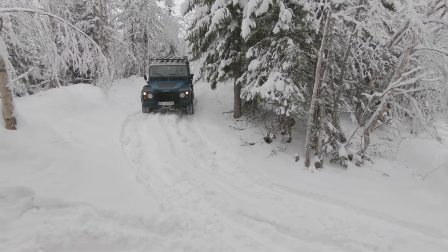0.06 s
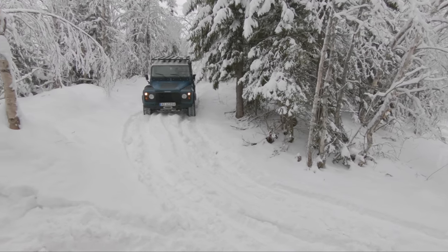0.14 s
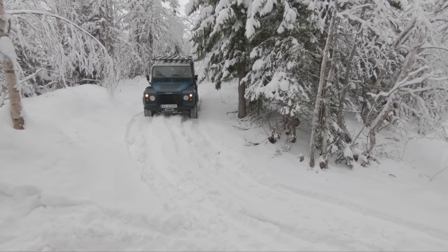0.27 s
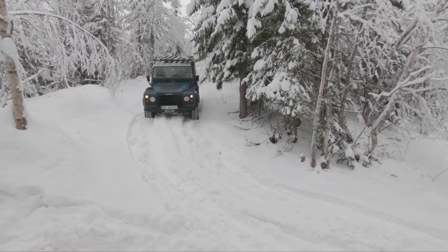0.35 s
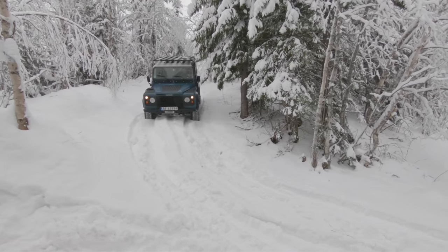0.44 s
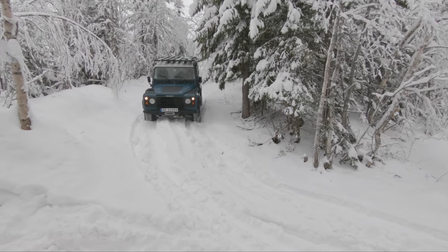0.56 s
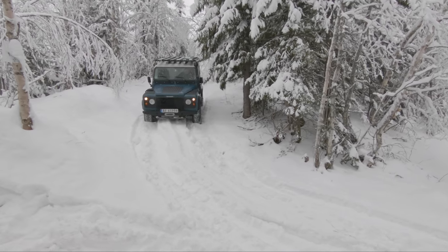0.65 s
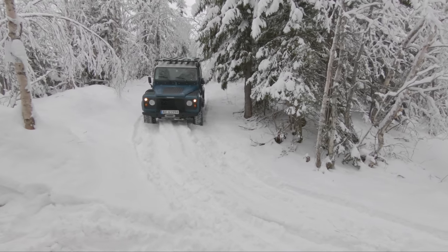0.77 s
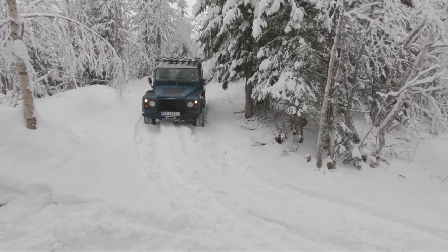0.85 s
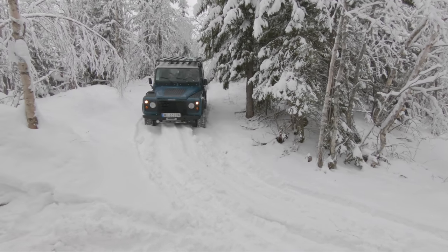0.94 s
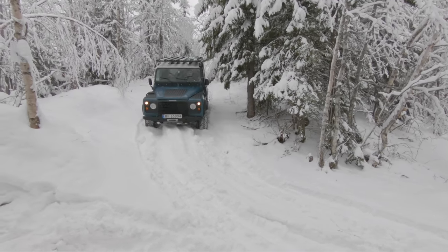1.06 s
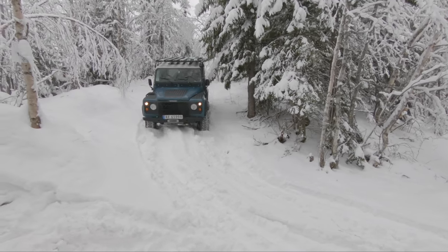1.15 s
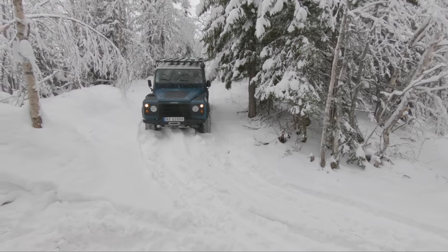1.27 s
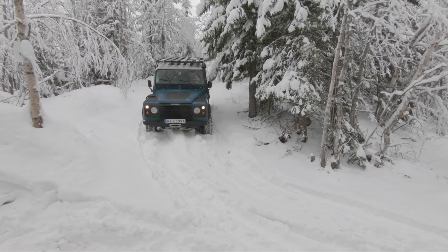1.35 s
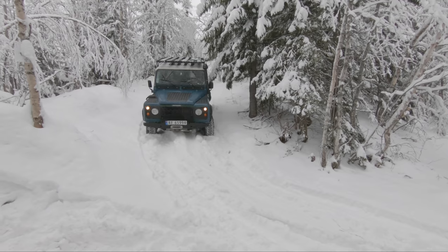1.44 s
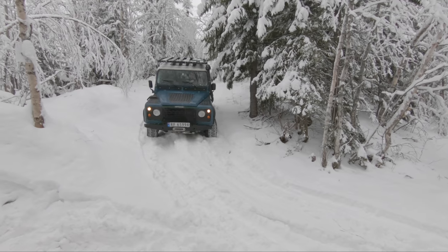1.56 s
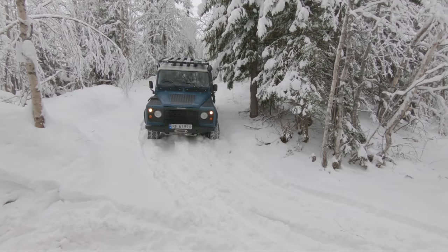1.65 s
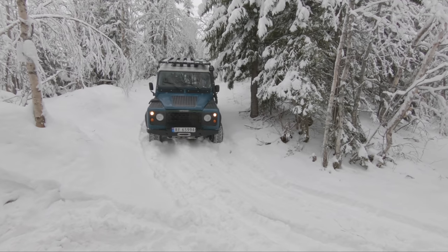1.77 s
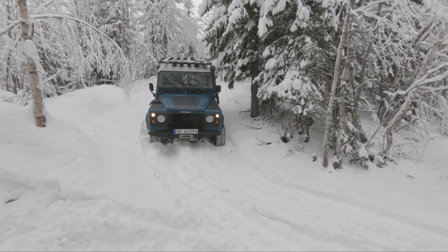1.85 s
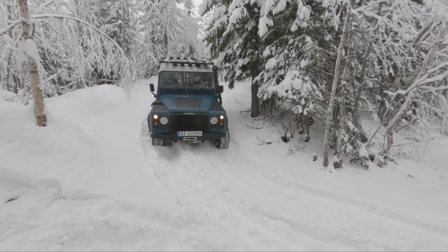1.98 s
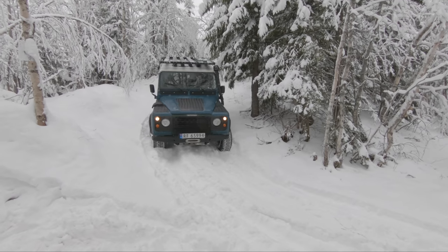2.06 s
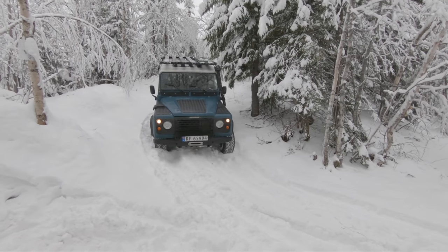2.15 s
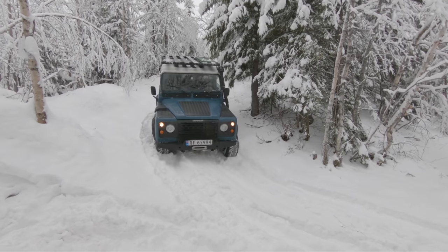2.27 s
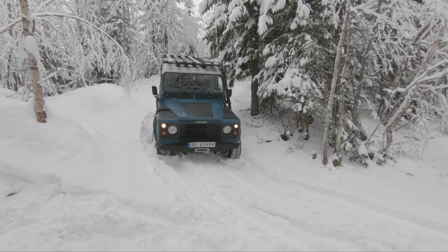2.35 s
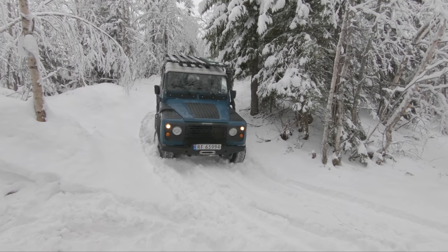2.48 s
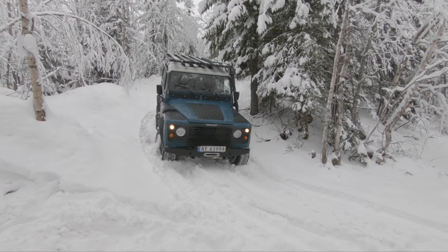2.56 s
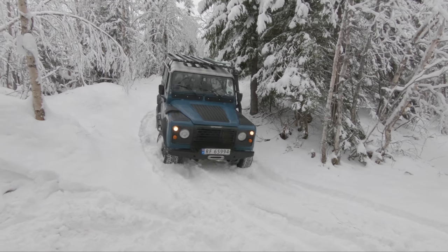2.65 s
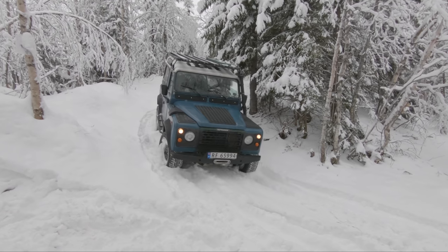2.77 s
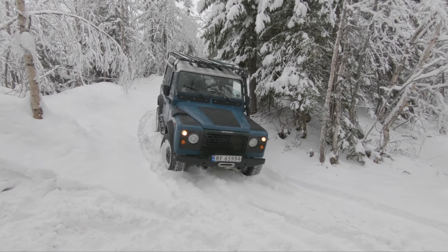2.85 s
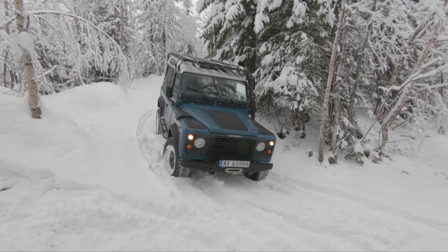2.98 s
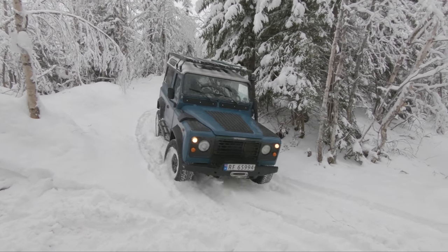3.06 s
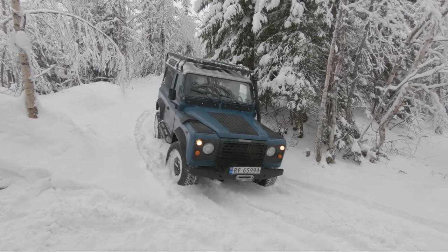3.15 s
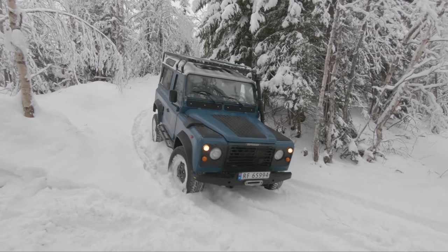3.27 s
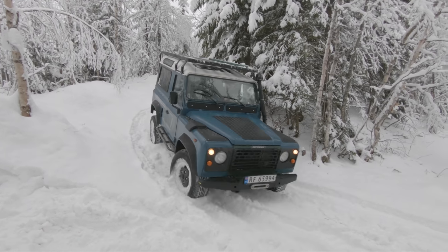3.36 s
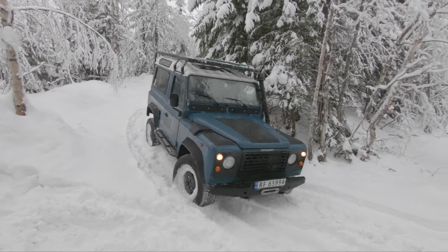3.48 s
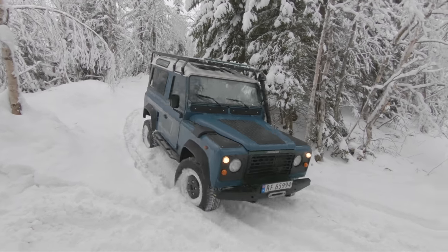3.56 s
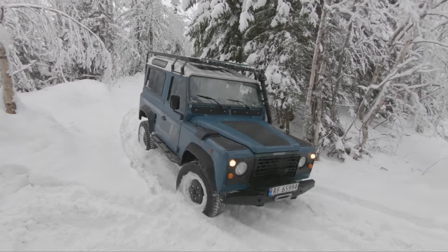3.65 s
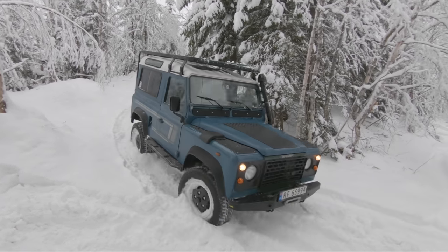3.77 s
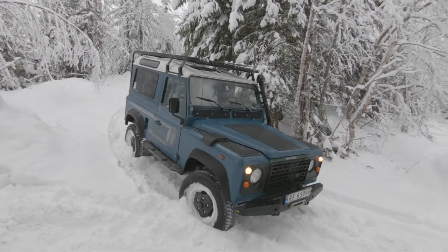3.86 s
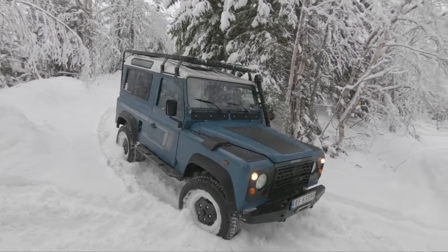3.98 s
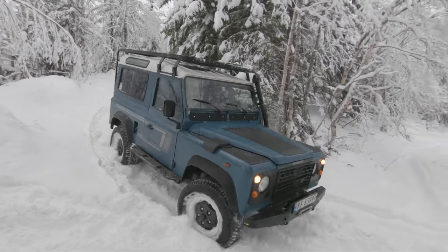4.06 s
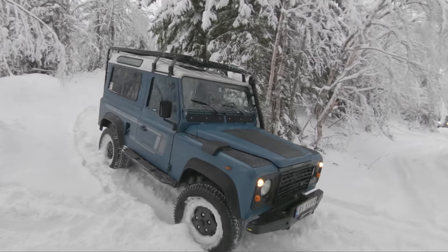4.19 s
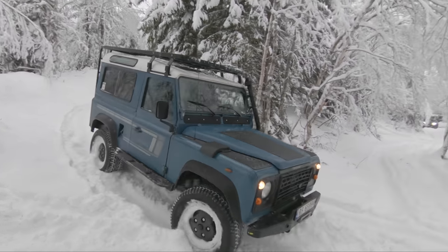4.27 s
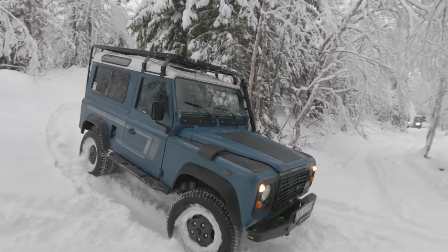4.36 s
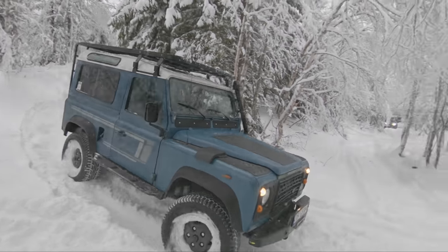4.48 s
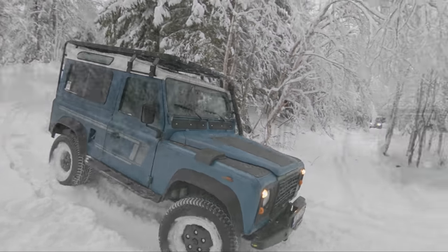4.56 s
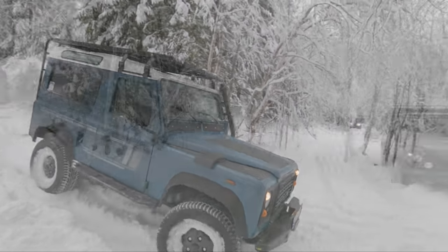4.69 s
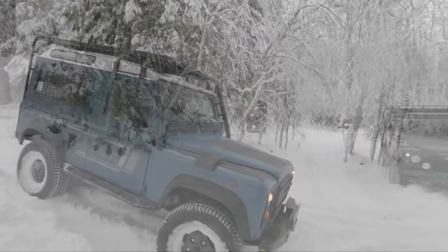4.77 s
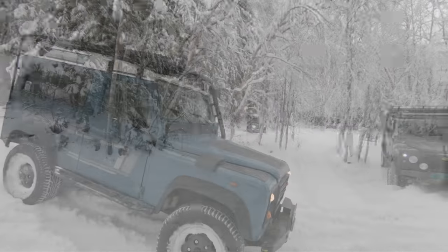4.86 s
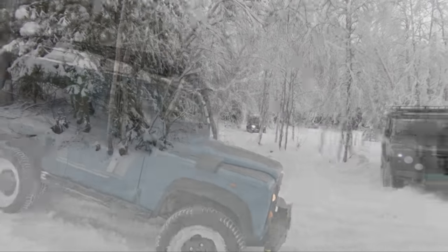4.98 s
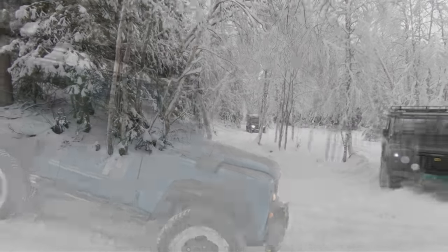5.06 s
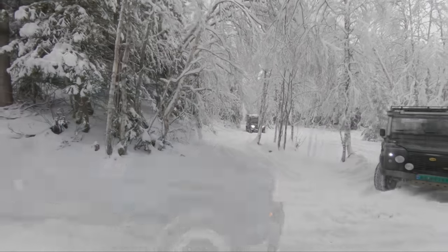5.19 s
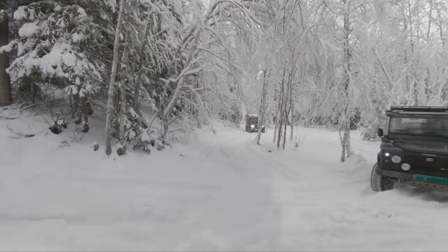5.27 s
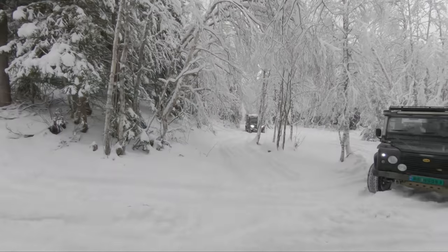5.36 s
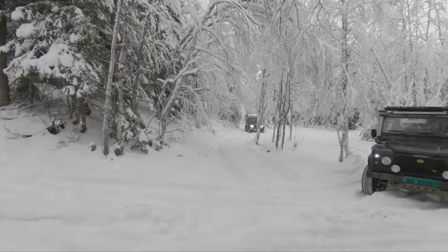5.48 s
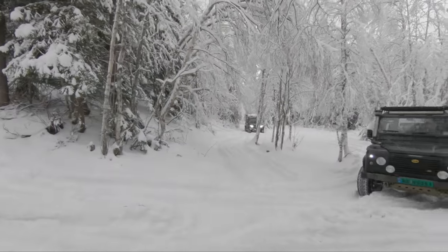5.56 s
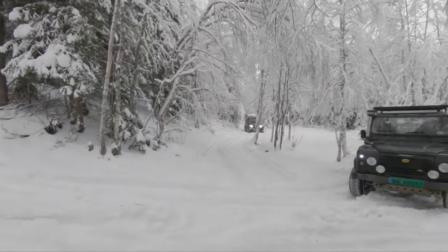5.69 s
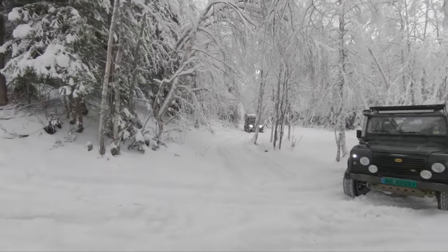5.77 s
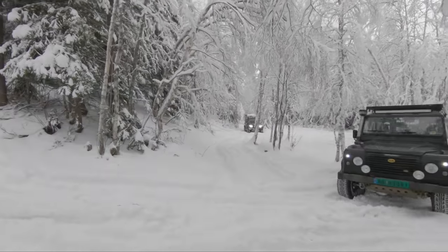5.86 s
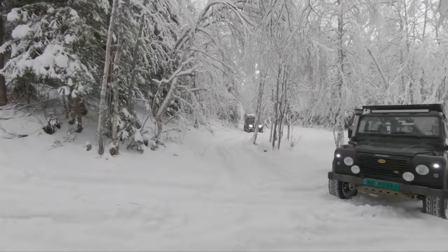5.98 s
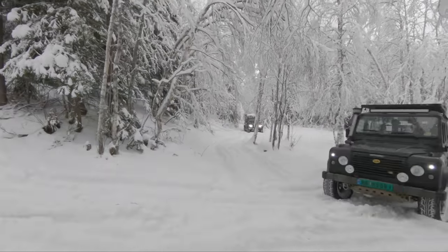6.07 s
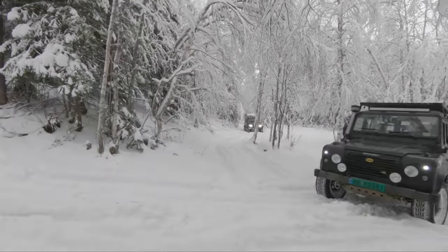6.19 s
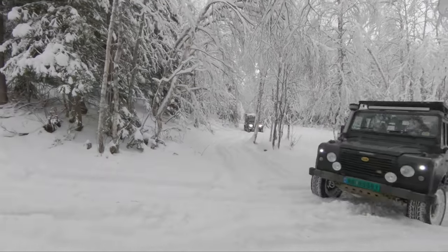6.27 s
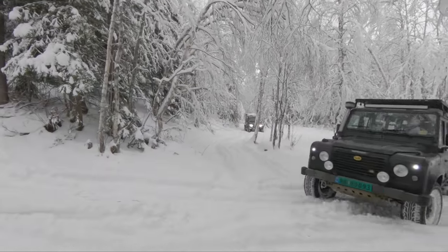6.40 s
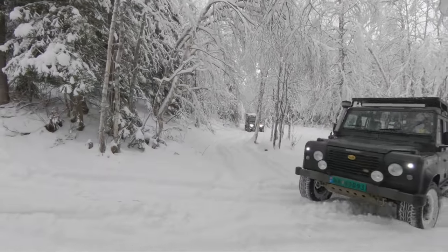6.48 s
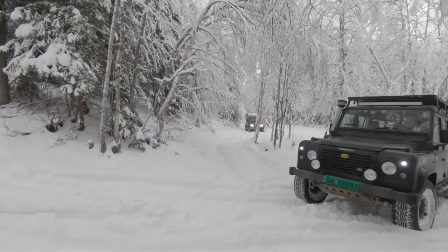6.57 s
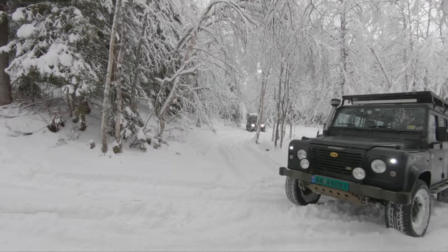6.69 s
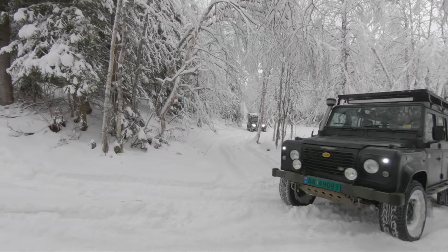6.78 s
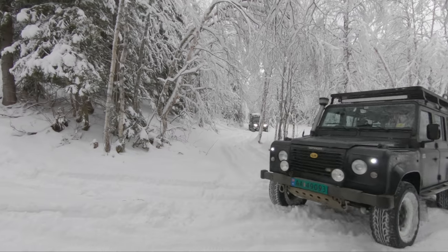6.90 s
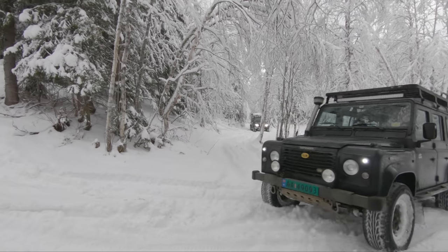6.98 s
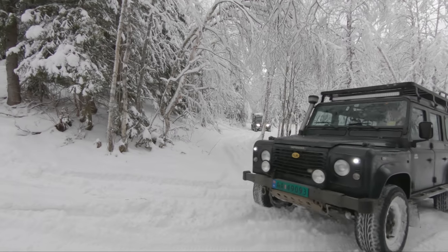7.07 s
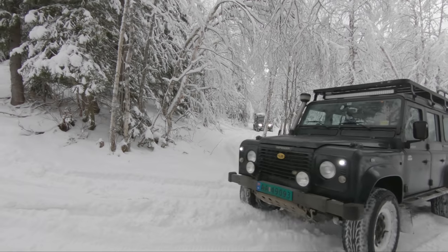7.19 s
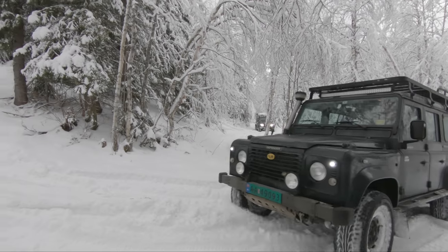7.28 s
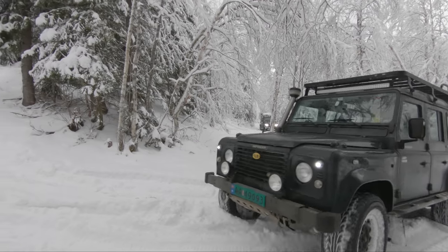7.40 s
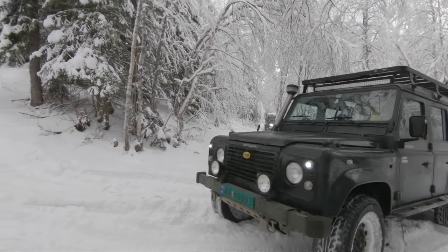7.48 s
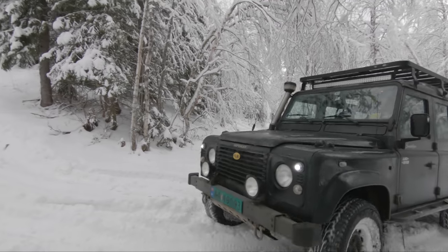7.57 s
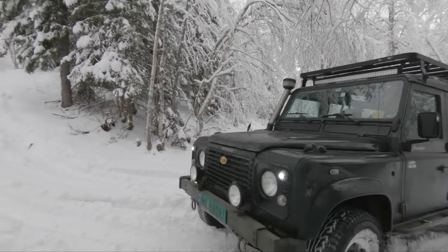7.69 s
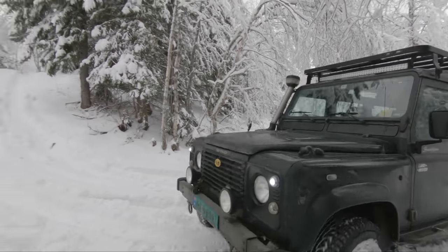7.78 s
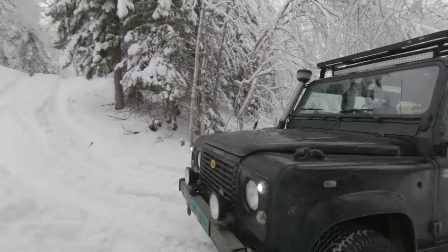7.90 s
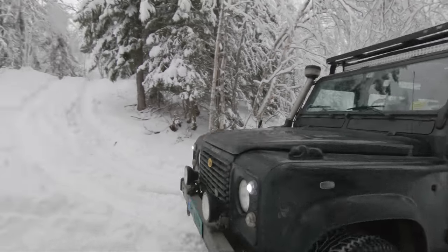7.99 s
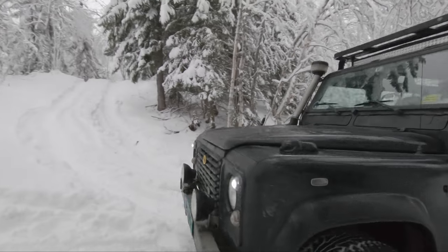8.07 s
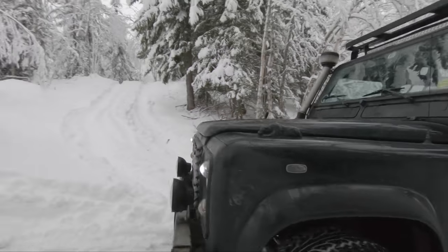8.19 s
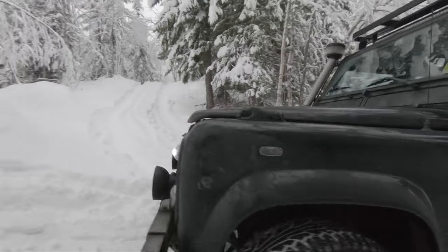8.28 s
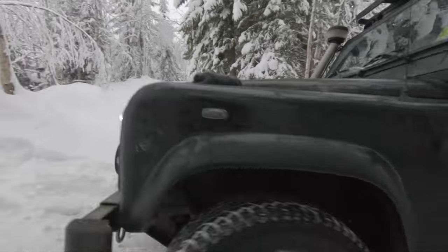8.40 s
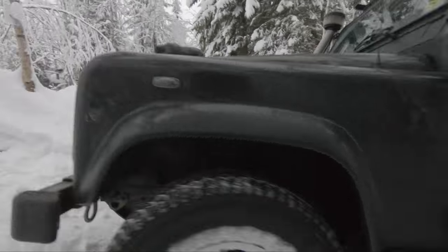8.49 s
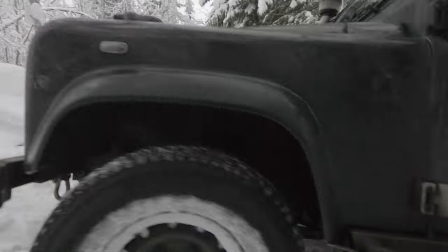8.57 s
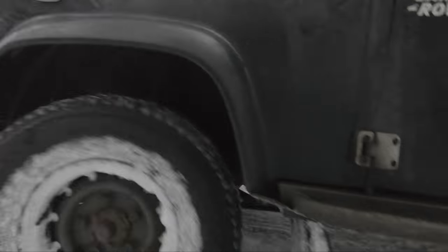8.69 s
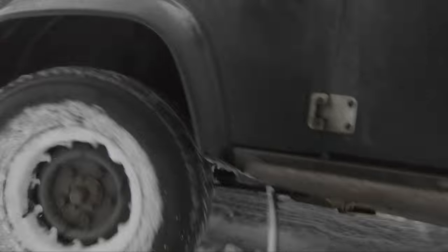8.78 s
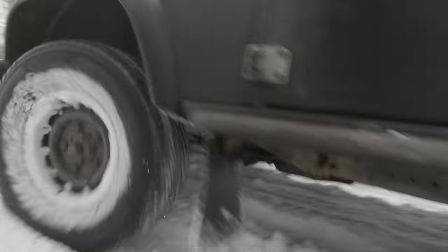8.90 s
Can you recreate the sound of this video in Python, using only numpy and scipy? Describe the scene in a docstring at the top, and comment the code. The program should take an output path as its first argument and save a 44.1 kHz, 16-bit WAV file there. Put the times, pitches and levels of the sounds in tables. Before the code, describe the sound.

Close mono trackside pickup, dry in the snow. First a lumpy idling diesel comes nearer, clattering, with tyres softly packing snow, body booms and a chassis clunk. It dissolves into another diesel, quicker and harder, its knocks merging into a hissing clatter and two-tone drone. Gear hum, intake rush and thin turbo whistle build as tyres churn past, ending loud and bassy.

```python
"""A forest track in deep snow, heard from the trackside on one mono microphone: two four-cylinder diesels crawl up.
The first nears from 14 m to 6 m at little over idle, and cross-fades into the second, whose revs and turbo
climb as it passes about 3 m away. Each firing is a pulse, filtered into exhaust thump or drone, or an envelope
that gates clicks and noise into block knock and hissing clatter. Filtered clicks make the tyres press the snow,
struck filters make the ticks and clunks, and moving sines and resonances make panel, gears and whistle."""
import sys
import numpy as np
from scipy import signal
from scipy.fft import rfft, irfft, next_fast_len
from scipy.io import wavfile
from scipy.ndimage import uniform_filter1d

SR = 44100
rng = np.random.default_rng(int(sys.argv[2]) if len(sys.argv) > 2 else 0)


def inscribe(sig):
    """Save sig as 16-bit PCM at rate SR to the path in sys.argv[1].

    A 1-D sig is mono; a 2-D sig holds one channel per row.
    Samples are clipped to [-1, 1] before scaling.
    """
    pcm = np.round(np.clip(np.atleast_2d(sig).T, -1, 1) * 32767)
    wavfile.write(sys.argv[1], SR, pcm.astype(np.int16))


N = 394239
T = np.arange(N) / SR  # time, s

# distance of the first car from the microphone: (t/s, distance/m)
FIRST_DISTANCE = [(0, 14.1), (2, 11.7), (3.2, 8.48), (4.4, 5.9)]
# distance of the second car's engine from the microphone: (t/s, distance/m)
SECOND_DISTANCE = [(4.6, 9.8), (5.6, 7.06), (6.6, 5.06), (7.6, 3.42), (8.1, 3.32), (8.5, 2.8), (8.94, 3.1)]
# engine speed of the second car, picking up in steps: (t/s, firing rate/Hz)
SECOND_RATE = [(4.5, 47.1), (4.9, 47.7), (5.15, 50.3), (5.33, 53.2), (5.6, 55.65), (5.9, 56.25),
               (6.28, 62.6), (6.52, 65.5), (6.8, 65.85), (7.05, 64.3), (7.33, 66.2), (7.55, 64.4),
               (7.8, 63.4), (8.21, 69.3), (8.38, 69.8), (8.6, 69.1), (8.94, 70.6)]
# colour of snow packed under a tyre: (f/Hz, relative level/dB)
PACKED_SNOW = [(50, -10), (110, 3.5), (200, -2), (320, 1.5), (410, -5), (500, -9), (560, -24), (680, -14.5),
               (800, -10), (1080, -19.5), (2000, -41.5)]


def undb(db):
    """Decibels to gain."""
    return 10 ** (np.asarray(db) / 20)


def curves(table):
    """Each column of a table, joined by straight lines in time."""
    s, *columns = np.transpose(table)
    return [np.interp(T, s, column) for column in columns]


def unit(x):
    """Scale to rms 1."""
    return x / np.sqrt(np.mean(x ** 2))


def noise():
    """White noise."""
    return rng.standard_normal(N)


def walk(rate):
    """Slow chance with a spread near 1: random knots, rate per second, joined by straight lines."""
    knots = rng.standard_normal(4096)
    return np.interp(T * rate, np.arange(len(knots)), knots)


def colour(x, points):
    """Minimum-phase filter with the given (f/Hz, dB) response, falling away above the last point; rms 1."""
    size = next_fast_len(N + SR, real=True)
    hz, db = np.transpose(points)
    octave = np.log2(np.arange(size // 2 + 1) * SR / size + 1)
    fall_db = 20 * np.maximum(octave - np.log2(hz[-1]), 0)
    response_db = np.interp(octave, np.log2(hz), db) - fall_db
    # folding the cepstrum onto positive times makes the filter causal
    cepstrum = irfft(np.log(undb(response_db)), size)
    cepstrum[1:size // 2] *= 2
    cepstrum[size // 2:] = 0
    response = np.exp(rfft(cepstrum))
    return unit(irfft(rfft(x, size) * response, size)[:N])


def ring(x, hz, width_hz):
    """A resonance whose centre may move: shift down to zero, low-pass, shift back; rms 1."""
    turn = np.exp(2j * np.pi * np.cumsum(hz + np.zeros(N)) / SR)
    lowpass = signal.butter(2, width_hz / 2, fs=SR, output="sos")
    return unit((signal.sosfilt(lowpass, x / turn) * turn).real)


def tone(hz):
    """A sine on a moving pitch; rms 1 when steady."""
    return np.sqrt(2) * np.sin(2 * np.pi * np.cumsum(hz) / SR)


def impacts(per_s, spread_db):
    """Dense small clicks of unequal size and random sign; rms 1."""
    present = rng.random(N) < per_s / SR
    size = undb(spread_db * np.minimum(rng.exponential(size=N), 3))
    return unit(present * np.sign(noise()) * size)


def firings(cycle):
    """One pulse at the start of every cycle; a cycle lasts from one firing to the next."""
    return np.diff(np.floor(cycle), prepend=np.floor(cycle[0]))


def strength(cycle, cylinder_db, scatter_db):
    """Size of the current firing: a level for each of four cylinders, plus scatter from firing to firing."""
    k = np.floor(cycle).astype(int) + 2
    return undb(np.array(cylinder_db)[k % 4] + scatter_db * rng.standard_normal(1024)[k])


def burst(cycle, rise, fall):
    """Envelope that jumps at each firing and dies away; times are shares of a cycle; rms 1."""
    phase = cycle % 1
    return unit((1 - np.exp(-phase / rise)) * np.exp(-phase / fall))


def soften(envelope, ms):
    """Spread the edges of an envelope over a few milliseconds."""
    return uniform_filter1d(envelope, max(int(ms * SR / 1000), 1))


def double_knock(cycle, lag, scatter_db):
    """Envelope of a combustion knock and the piston's slap a share of a cycle later, each of its own strength."""
    knock = burst(cycle, rise=.1, fall=.16) * strength(cycle, [.4, -.7, 0, .3], scatter_db)
    late = cycle - lag
    slap = burst(late, rise=.1, fall=.2) * strength(late, [-2, -2, -2, -2], scatter_db)
    return unit(soften(np.hypot(knock, slap), 2.7))


def strike(s, decay_s):
    """Envelope of one small impact: a 1.8 ms attack on an exponential decay."""
    age = np.maximum(T - s, 0)
    return np.exp(-age / decay_s) * np.minimum(age / 0.0018, 1)


def blows(rows, points):
    """Single hard blows, (t/s, peak/dB), on a body with the given (f/Hz, dB) response."""
    click = colour(1. * (T == 0), points)
    return sum(undb(db) * np.interp(T - s, T, click, left=0) for s, db in rows) / np.abs(click).max()


def swell(s, length_s, db):
    """Gain of a smooth rise and fall; the length is taken at half height."""
    return undb(db) * 2 ** -((2 * (T - s) / length_s) ** 2)


def fade(start_s, end_s):
    """Straight ramp from 0 to 1; the cars' cross-fades use it as a share of power."""
    return np.clip((T - start_s) / (end_s - start_s), 0, 1)


def spreading(distance):
    """Gain of a moving source: one over its distance in metres."""
    return 1 / curves(distance)[0]


def first_exhaust(cycle, near):
    """Each firing kicks the exhaust into a separate low thump, over a steady boom of the body."""
    # exhaust response: (f/Hz, relative level/dB)
    pipe_colour = [(14, -22), (22, -5), (29, 1), (40, 0), (60, 2.5), (88, -3), (118, -11), (150, -18),
                   (240, -42), (400, -46.5), (600, -84)]
    # body boom response: (f/Hz, relative level/dB)
    boom_colour = [(16, -14), (26, -2), (40, -2), (53, 2), (68, -3), (100, -8), (150, -19), (300, -38)]
    stroke = cycle - .58 + .014 * walk(12)
    pulses = firings(stroke) * strength(stroke, [-.1, -.3, .5, -.6], 1.0)
    thumps = -colour(pulses, pipe_colour) * undb(-17.5) * near
    boom = colour(noise(), boom_colour) * undb(-41.5)  # steady at the microphone
    return thumps + boom


def first_block(combustion, near):
    """Combustion blows drive clicks and noise through the block, rattle a panel and keep the housing ringing."""
    # block response: (f/Hz, relative level/dB)
    knock_colour = [(450, -53), (650, -13.5), (800, -14.5), (950, -11.5), (1100, -17.5), (1400, 1.5),
                    (1550, -2), (1760, 2), (1950, -4.5), (2300, -25.5), (2800, -7.5), (3300, -18),
                    (5000, -37), (7500, -52.5)]
    # mean level of the ringing panel at the microphone: (t/s, level/dB)
    panel_level = [(0, -67), (1.2, -63), (1.93, -54.5), (2.6, -61), (3.35, -53.5), (3.7, -58), (4.0, -67),
                   (4.2, -66), (4.42, -55)]
    # mean pitch of the panel: (t/s, f/Hz)
    panel_pitch = [(0, 1770), (1.0, 1690), (2.3, 1660), (3.3, 1680), (4.3, 1765)]
    blow = double_knock(combustion - .08 + .02 * walk(30), lag=.2, scatter_db=1.2)
    hits = (blow + .45) * (impacts(per_s=2000, spread_db=1.5) + .6 * noise())
    knock = colour(hits, knock_colour) * undb(-39) * near
    # the panel rattles at every blow, at a pitch that wanders; the housing rings on between them
    panel_hz = curves(panel_pitch)[0] + 29 * walk(160)
    panel_db = curves(panel_level)[0] + 1.0 * walk(30.6)
    panel = unit((soften(blow, 3.6) + 0.36) * tone(panel_hz)) * undb(panel_db)
    housing = ring(hits, 831, 26) * undb(-52.5) * near
    return knock + panel + housing


def first_injectors(combustion, near):
    """Injection gates a spray of clicks and hiss into clatter, and rings the nozzles unequally."""
    # clatter response: (f/Hz, relative level/dB)
    clatter_colour = [(1000, -24), (2000, -3), (3200, -10), (3900, -3), (4500, -3.5), (5200, -1),
                      (6100, -7.5), (6800, -18), (7700, -29.5), (8500, -29), (10000, -40), (11200, -55),
                      (12500, -44), (15500, -71.5)]
    injection = combustion - .025
    pulse = burst(injection, rise=.26, fall=.31) * strength(injection, [.2, -.3, .2, -.1], .7)
    spray = (soften(pulse, 5) + .65) * (impacts(per_s=2600, spread_db=0) + 1.2 * noise())
    clatter = colour(spray, clatter_colour) * undb(-32)
    squirt = soften(burst(injection, rise=.15, fall=.25) * strength(injection, [1, -1, -1, 1], 2), 5)
    nozzles = ring(squirt * impacts(per_s=1300, spread_db=-4.0), 5300, 600) * undb(-52.5)
    return (clatter + nozzles) * near


def tappets(combustion, near):
    """Dry valve ticks just after each knock; one cylinder's loose tappet stands out, and now and then clacks."""
    # valve gear response: (f/Hz, relative level/dB)
    tappet_colour = [(1200, -35), (2000, -9), (2700, 0), (3300, -1), (4000, -6), (5500, -20), (7000, -45)]
    # loudest clacks of the loose tappet, as heard at the microphone: (t/s, level/dB)
    clacks = [(2.329, -51.5), (2.463, -57), (3.837, -52), (4.11, -53), (4.385, -51)]
    valve = combustion - .17
    pulse = burst(valve, rise=.08, fall=.2) * strength(valve, [-6, -7, -5, 0], 1.5)
    taps = unit(pulse) * undb(-45) * near
    drive = taps + sum(strike(s, decay_s=0.025) * undb(db) for s, db in clacks)
    return colour(impacts(per_s=1600, spread_db=7.5) + .5 * noise(), tappet_colour) * drive


def first_car():
    """A diesel near idle: exhaust, block, injectors and valves on one firing cycle, treble fading out earlier."""
    # engine speed, hunting around idle: (t/s, firing rate/Hz)
    idle_rate = [(0.0, 31.27), (0.51, 29.71), (0.84, 30.07), (1.42, 28.37), (2.05, 31.06), (2.2, 29.24),
                 (2.81, 28.76), (2.99, 30.08), (3.47, 28.49), (3.87, 29.67), (4.3, 28.17), (4.42, 28.52),
                 (5.3, 26.64)]
    cycle = np.cumsum(curves(idle_rate)[0]) / SR
    near = spreading(FIRST_DISTANCE)
    combustion = cycle - .097
    bass = first_exhaust(cycle, near)
    treble = first_block(combustion, near) + first_injectors(combustion, near) + tappets(combustion, near)
    return bass * np.sqrt(1 - fade(4.74, 5.23)) + treble * np.sqrt(1 - fade(3.3, 5.52))


def first_tyres():
    """Tyres pack the snow in dull crunches, groan from close by and rock the body into a boom."""
    # groan response: (f/Hz, relative level/dB)
    groan_colour = [(50, -19.5), (85, 1), (125, 4), (165, -8.5), (235, -7), (300, -21), (550, -38.5)]
    # lurches that rock the body into resonance: (t/s, length/s, level/dB)
    lurches = [(1.313, 0.09, -36.5), (1.562, 0.1, -31.5), (1.754, 0.08, -28.5), (2.217, 0.15, -35),
               (2.423, 0.17, -36.5), (3.415, 0.084, -34)]
    crunch = colour(impacts(per_s=1100, spread_db=1.5), PACKED_SNOW) * undb(-57)
    # the groan carries only a short way: -49 dB at 7.2 m, 5 dB less for each metre beyond
    groan_db = -49 - 5 * (curves(FIRST_DISTANCE)[0] - 7.2)
    groan = colour(impacts(per_s=360, spread_db=4.0), groan_colour) * undb(groan_db)
    body_hz = 53.7 + 1.84 * walk(9.7)
    swing = tone(body_hz) * sum(swell(*lurch) for lurch in lurches)
    return (crunch + groan + swing) * np.sqrt(1 - fade(4.3, 5.4))


def ticks():
    """Cracks in the snow crust, a dry clunk of the chassis and the engines' hardest knocks."""
    # snow cracks: (t/s, level/dB, centre f/Hz, width/Hz, decay/s)
    crack_rows = [(.34, -73, 7900, 900, .007), (.366, -72, 7900, 900, 0.0072),
                  (4.602, -61, 8830, 1000, 0.0046), (4.614, -60, 8900, 700, .004)]
    # the chassis clunks and rebounds: (t/s, peak level/dB)
    clunks = [(2.198, -38.5), (2.2015, -50)]
    # chassis response: (f/Hz, relative level/dB)
    chassis = [(100, -4), (220, 2), (400, -5), (570, -13), (780, 4), (1000, -5), (1300, -20), (3000, -24)]
    # firings that knock harder than the rest: (t/s, peak level/dB before the trim below)
    hard_knocks = [(0.1715, -50), (0.3326, -47), (1.0013, -45), (1.349, -42), (1.8614, -42), (1.8936, -48),
                   (2.6337, -45), (3.047, -48), (3.109, -45), (3.178, -39), (3.244, -44), (3.3159, -41),
                   (3.3874, -37), (3.4195, -41), (3.5603, -42), (3.5952, -39), (4.358, -45), (4.5321, -40),
                   (5.1657, -39), (5.2635, -41), (5.3587, -39), (5.4523, -42)]
    # what the hard knocks ring with: (f/Hz, relative level/dB)
    hard_knock_ring = [(1100, -38.5), (1430, -13), (1550, -5), (1740, 5.5), (1850, 3), (2050, -17),
                       (2230, -9.5), (2600, -28.5), (5000, -38.5)]
    cracks = 0
    for s, db, hz, width_hz, decay_s in crack_rows:
        cracks = cracks + ring(noise(), hz, width_hz) * undb(db) * strike(s, decay_s)
    return cracks + blows(clunks, chassis) + blows(hard_knocks, hard_knock_ring) * undb(-.5)


def revs():
    """Doublings of the second engine's speed above a cruise of 65 firings per second."""
    return np.log2(curves(SECOND_RATE)[0] / 65)


def driven(db, db_per_doubling):
    """Gain of a layer of the second car: db at 1 m and cruising revs, louder with revs and with nearness."""
    return undb(db + db_per_doubling * revs()) * spreading(SECOND_DISTANCE)


def second_block(combustion):
    """Quick diesel knock: blows excite the block's response, its modes, a moving ring and a repeating slap."""
    # block response: (f/Hz, relative level/dB)
    knock_colour = [(450, -61), (620, -6.5), (740, -10.5), (1000, -5.5), (1110, -20), (1260, -5),
                    (1550, 7.5), (1820, 11), (2150, -19.5), (2550, -2), (3100, -22.5), (5000, -7),
                    (7500, -41)]
    # block resonances: (f/Hz, width/Hz, level/dB at cruise before the layer's gain, dB per doubling of the revs)
    block_modes = [(805, 90, -25.5, -38), (1863, 250, -6.5, 17), (2650, 700, -12.5, 12)]
    # the strongest ring, creeping upward as the engine pulls: (t/s, mean f/Hz, level/dB before the trim below)
    block_ring = [(4.6, 1405, -58.5), (5.0, 1456, -51), (5.4, 1501, -57), (5.85, 1535, -50.5),
                  (6.4, 1540, -51.5), (6.9, 1660, -58), (7.6, 1695, -56), (8.5, 1607, -46),
                  (8.94, 1685, -57)]
    blow = double_knock(combustion, lag=.3, scatter_db=1.3)
    # the knocks stand apart at low revs and run together at speed
    blur = 1.1 * 12 ** revs()
    hits = unit((blow + blur) * (impacts(per_s=2200, spread_db=.5) + .6 * noise()))
    knock = colour(hits, knock_colour) * undb(-2.5)
    for hz, width_hz, db, rise_db in block_modes:
        knock = knock + ring(hits, hz, width_hz) * undb(db + rise_db * revs())
    ring_hz, ring_db = curves(block_ring)
    ringing = unit((soften(blow, 2) + .2) * tone(ring_hz + 85 * walk(250))) * undb(ring_db - .5)
    # piston slap repeats nearly alike at each firing and draws fine lines through the knock
    slaps = firings(combustion) * strength(combustion, [-9.0, -8.0, -8.5, -10.0], 0.32)
    slap = colour(slaps, knock_colour) * undb(-13.0)
    return (knock + slap) * driven(-32, 2.2) + ringing


def second_injectors(squirt, screened_s):
    """Injection gates clicks and noise into clatter that blurs to a hiss, with a ring that sinks as revs rise."""
    # clatter response: (f/Hz, relative level/dB)
    clatter_colour = [(1100, -48), (2200, -5.5), (3100, -8.5), (3700, 0.5), (4300, 0), (4700, 1.5),
                      (5200, 0.5), (5800, -5.5), (6500, -9.5), (7500, -23), (9000, -38), (12000, -34)]
    spray = (squirt + 1.2) * (impacts(per_s=2600, spread_db=2) + .9 * noise())
    nozzle_hz = 5150 + 130 * walk(60)
    nozzles = ring(spray, nozzle_hz, 330) * undb(-15.0 - 12 * revs())
    screening = undb(-11.5 * screened_s)  # dB per second
    return (colour(spray, clatter_colour) + nozzles) * driven(-29, 12.7) * screening


def intake(squirt, screened_s):
    """Air rushes into the intake as filtered noise pulsing with the firings, loudest as the snorkel goes by."""
    # intake response: (f/Hz, relative level/dB)
    air_colour = [(5000, -17), (7300, 0.5), (8500, 6), (9800, -3), (11300, -26), (12400, -8), (14000, -20),
                  (15500, -27)]
    # gulps as the car picks up, and again as the snorkel goes by: (t/s, length/s, gain/dB)
    gulps = [(6.403, 0.77, -75), (8.181, 0.24, -62.5)]
    rush = driven(-50, 9.8) * undb(-8 * screened_s)  # dB per second
    return colour((squirt + 2) * noise(), air_colour) * (rush + sum(swell(*gulp) for gulp in gulps))


def second_engine(cycle):
    """Block, injectors and intake on one firing cycle, with powder hissing off the tyres."""
    combustion = cycle - .8
    squirt = burst(combustion + .15, rise=.25, fall=.5)
    # once the grille has gone by, the wing screens off the treble
    screened_s = np.maximum(T - 8.61, 0)
    powder = ring(noise(), 6190, 770) * swell(7.7, length_s=1.8, db=-48.5)
    layers = second_block(combustion) + second_injectors(squirt, screened_s) + intake(squirt, screened_s)
    return (layers + powder) * np.sqrt(fade(4.52, 4.95))


def repeating(cycle, size):
    """A rough motion that comes round alike every four firings; it draws steady lines between the harmonics."""
    return np.interp(cycle / 4 * size, np.arange(size), rng.standard_normal(size), period=size)


def second_exhaust(cycle):
    """Under load the firings merge into a two-tone drone with a rasp on top; the engine shudders on its mounts."""
    # exhaust drone, before slow wavering: (t/s, firing tone rms level/dB, its octave rms level/dB)
    drone_levels = [(5.2, -44, -48.5), (5.42, -35.5, -55), (5.95, -38, -43), (6.45, -44, -46.5),
                    (6.6, -34.5, -43.5), (7.15, -44, -51), (7.55, -38, -52), (7.9, -32.5, -40),
                    (8.27, -43.5, -36.5), (8.55, -28.5, -30), (8.94, -23, -34.5)]
    # exhaust rasp response: (f/Hz, relative level/dB)
    rasp_colour = [(60, -36.5), (110, 1), (170, 6), (205, -1.5), (250, 2.5), (290, -10), (330, -9),
                   (370, -15), (470, -14), (520, -23), (570, -32), (730, -38), (1100, -37)]
    # pipe resonances, lit up as the harmonics climb through: (f/Hz, width/Hz, level/dB before the layer's gain)
    pipe_modes = [(213, 15.4, -46), (313, 33, -54), (411, 47, -53.5), (473, 34, -58.5)]
    # shudder response: (f/Hz, relative level/dB)
    shudder_colour = [(70, -15), (110, -1), (150, 4.5), (190, -8.5), (230, 2), (280, -2.5), (340, -4.5),
                      (400, -5), (440, -16), (500, -5.5), (560, -35.5), (1000, -37)]
    tone_db, octave_db = curves(drone_levels)
    angle = 2 * np.pi * cycle
    firing_tone = np.cos(angle) * undb(tone_db + .8 * walk(20))
    octave = np.sin(2 * angle) * undb(octave_db + .8 * walk(20))
    drone = np.sqrt(2) * (firing_tone + octave)
    stroke = cycle - .3 + .004 * walk(60)
    pulses = firings(stroke) * strength(stroke, [2.2, -2, .9, -2.2], 1.0)
    rasp = -colour(pulses, rasp_colour) * driven(-34.5, 6.9)
    pipe = sum(ring(pulses, hz, width_hz) * undb(db) for hz, width_hz, db in pipe_modes) * driven(1.5, 13)
    shudder = colour(repeating(cycle, size=128), shudder_colour) * driven(-35.5, 2.7)
    return (drone + rasp + pipe + shudder) * np.sqrt(fade(4.55, 4.85))


def second_tyres():
    """Tyres press the snow in dense clicks, rumble as low noise and churn the snow up as they pass."""
    # rumble response: (f/Hz, relative level/dB)
    rumble_colour = [(18, -8.5), (27, 2.5), (40, -3), (55, 6.5), (90, 1), (130, -2.5), (180, -17),
                     (300, -22.5)]
    # churned snow response: (f/Hz, relative level/dB)
    churn_colour = [(30, -8), (60, -22), (110, 0), (150, 10.5), (210, 1), (300, -21), (400, -23),
                    (560, -24)]
    # when the passing tyres churn: (t/s, length/s, level/dB)
    heaves = [(7.9, 0.46, -46.5), (8.85, 1, -38.5)]
    snow = colour(impacts(per_s=1300, spread_db=1.0), PACKED_SNOW) * driven(-40, 12)
    # the rumble comes from the whole length of the car, so it grows more slowly with nearness
    rumble = colour(noise(), rumble_colour) * undb(-34) * np.sqrt(spreading(SECOND_DISTANCE))
    churn = colour(impacts(per_s=1200, spread_db=-1.0), churn_colour) * sum(swell(*heave) for heave in heaves)
    return (snow + rumble + churn) * np.sqrt(fade(4.55, 4.85))


def turbo():
    """A fluttering whistle in a breathy halo, two moving resonances of noise; it climbs with the boost."""
    # whistle, before its flutter: (t/s, f/Hz, level/dB)
    whistle_path = [(4.9, 7400, -84), (5.2, 7850, -77), (5.47, 8250, -68.5), (5.7, 8650, -85),
                    (6.1, 9600, -87), (6.36, 10250, -75), (6.55, 11100, -93), (6.9, 12050, -81),
                    (7.6, 12150, -77), (8.05, 12250, -72.5), (8.3, 12800, -71), (8.5, 13200, -63.5),
                    (8.7, 13450, -64.5), (8.94, 13800, -60.5)]
    hz, db = curves(whistle_path)
    whistle = unit(ring(noise(), hz, 130) + .8 * ring(noise(), hz, 450))
    return whistle * undb(db + 1.2 * walk(16)) * fade(4.7, 5.1)


def drive_train():
    """A wavering hum and a short whine from the second car's gears, as sines unsteady in pitch and level."""
    # mean pitch of the hum: (t/s, f/Hz)
    hum_pitch = [(5.2, 228.5), (6.2, 243.8), (6.65, 252), (7, 243), (7.3, 247.6), (8.3, 233.2), (8.7, 254)]
    hum_gain = undb(-41.5) * spreading(SECOND_DISTANCE) + swell(7.92, length_s=0.41, db=-47)
    whine_gain = swell(7.5, length_s=0.75, db=-62.5)
    gears = 0
    for hz, gain in ((curves(hum_pitch)[0], hum_gain), (729, whine_gain)):
        wavering = tone(hz * (1 + 0.0033 * walk(25)))
        gears = gears + wavering * gain * undb(2.0 * walk(7.8))
    return gears * fade(4.7, 6.04)


def scene():
    """Both cars heard direct, without echoes in the snow; both channels carry the same sound."""
    cycle = .847 + np.cumsum(curves(SECOND_RATE)[0]) / SR  # of the second car
    first = first_car() + first_tyres()
    second = second_engine(cycle) + second_exhaust(cycle) + second_tyres() + turbo() + drive_train()
    mono = first + ticks() + second
    return np.array([mono, mono])


def record(dry):
    """The recorder cuts the top: a steep low-pass at 15.7 kHz."""
    return signal.sosfilt(signal.ellip(8, .2, 70, 15700, fs=SR, output="sos"), dry)


dry = scene()
out = record(dry)
inscribe(out)
```